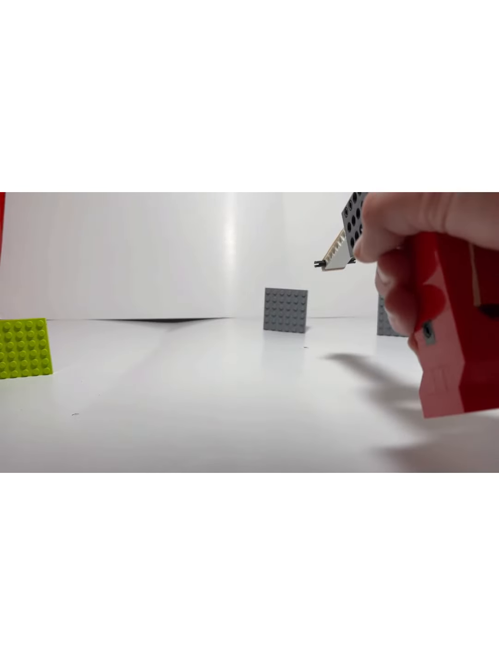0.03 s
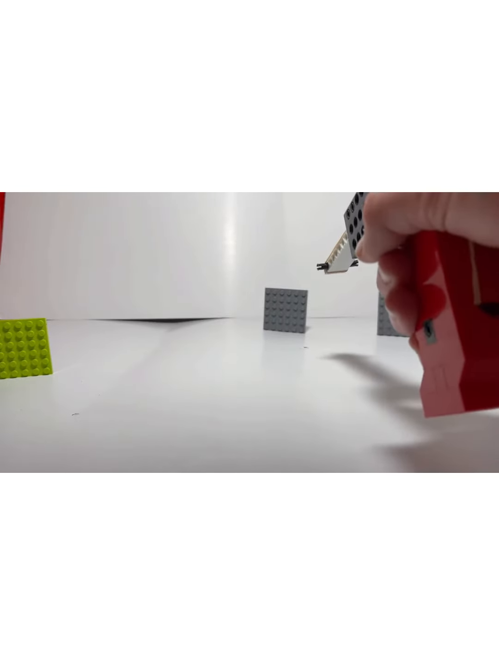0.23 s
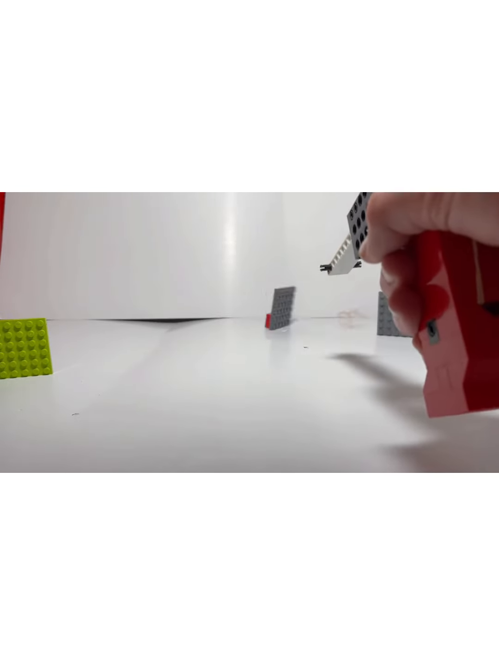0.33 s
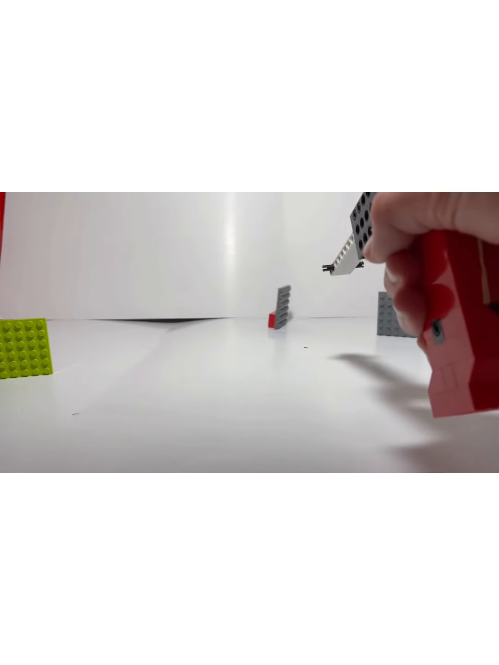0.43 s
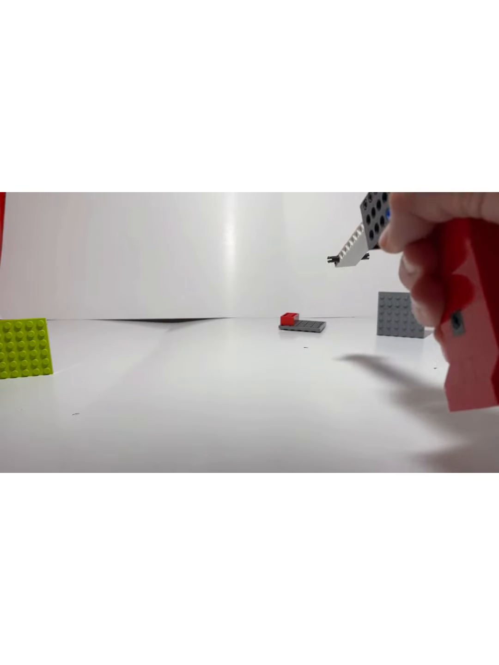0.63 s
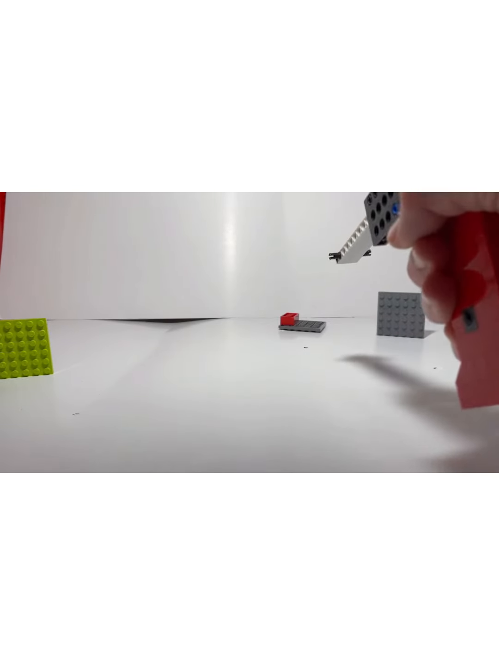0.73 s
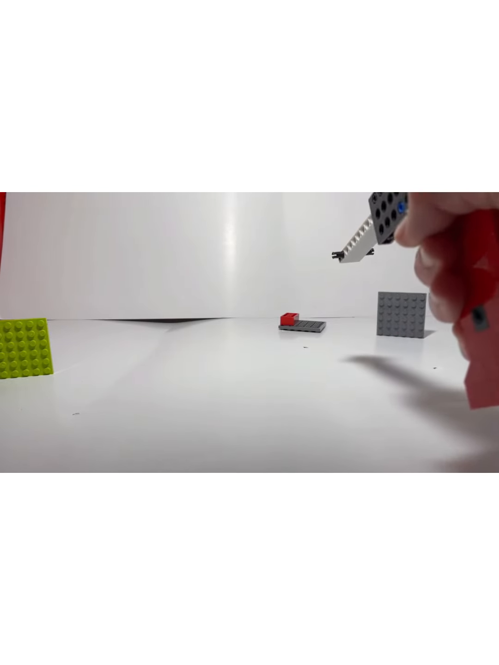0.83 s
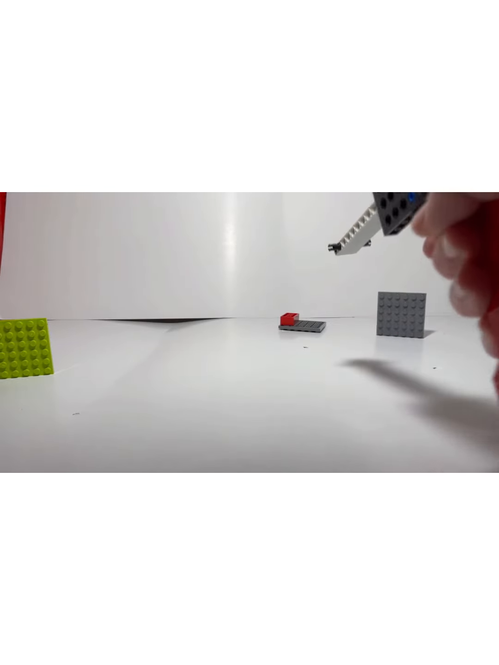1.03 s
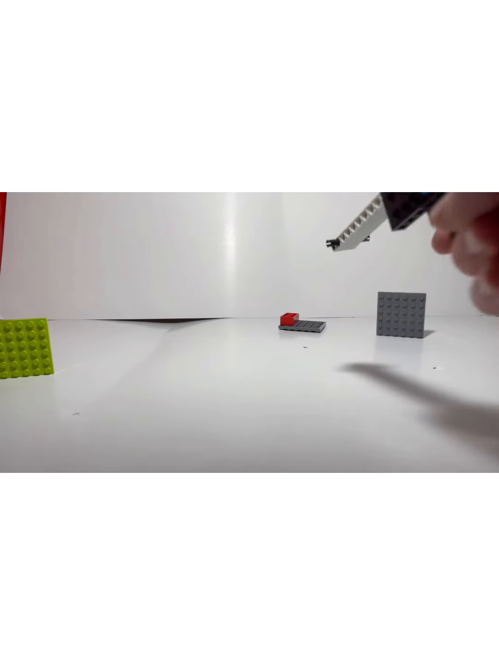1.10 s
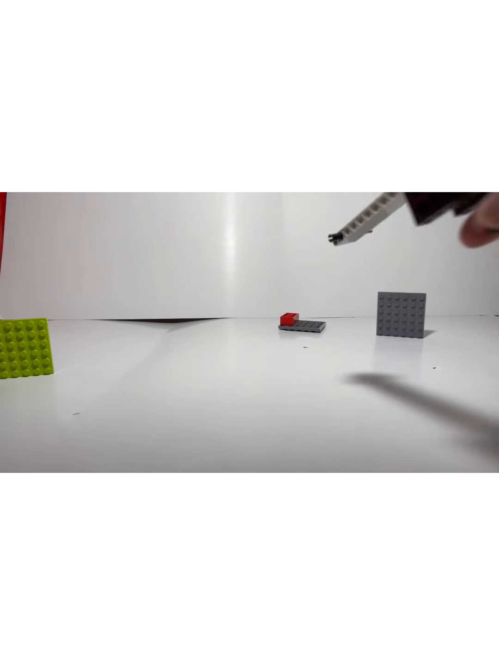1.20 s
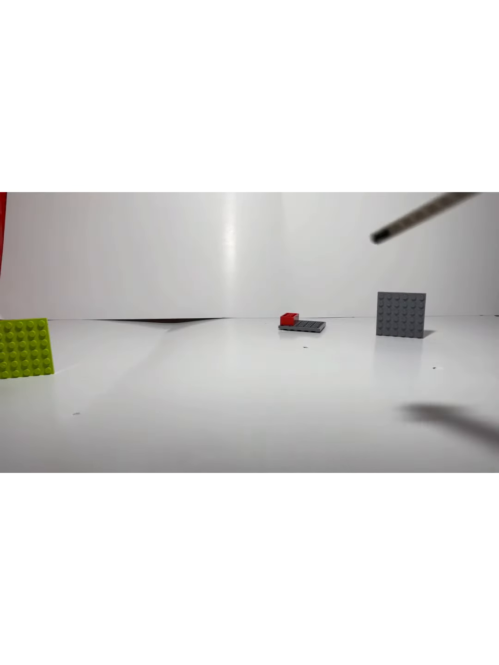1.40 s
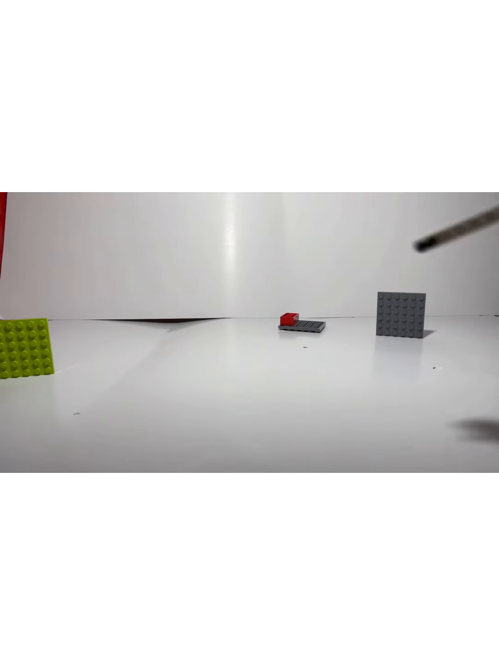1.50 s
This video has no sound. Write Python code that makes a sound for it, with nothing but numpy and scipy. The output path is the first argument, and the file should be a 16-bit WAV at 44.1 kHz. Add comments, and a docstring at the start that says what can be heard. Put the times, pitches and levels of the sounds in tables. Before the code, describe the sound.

Close stereo pickup indoors: tiny plastic ticks, a bright toy gun snap with a band slap, a brief low scrape, then a plastic plate clacks and bounces on a hollow tabletop, ending in soft sleeve rustle.

```python
"""Toy gun and plastic plate

A plastic toy gun close to the microphone creaks, releases and snaps as it fires a rubber band. The band
slaps a small plastic plate, which rocks, scrapes, tips and clacks flat on a hollow table top; a sleeve
brushes at the end. Every contact is a chattering push into decaying modes, plus a noise crack and a
fresh noise tail for the small room. Scrape and sleeve are patchy noise; the low hum is swaying noise."""
import sys
import numpy as np
from scipy import signal
from scipy.fft import rfft, irfft, next_fast_len
from scipy.io import wavfile
from scipy.ndimage import uniform_filter1d, map_coordinates

SR = 44100
rng = np.random.default_rng(int(sys.argv[2]) if len(sys.argv) > 2 else 0)


def natural_amplitude(level_db):
    """Convert a level in decibels to a linear amplitude factor, elementwise."""
    exponent = np.asarray(level_db, float) / 20
    return 10 ** exponent


def inscribe(sig):
    """Save sig as 16-bit PCM at rate SR to the path in sys.argv[1].

    A 1-D sig is mono; a 2-D sig holds one channel per row.
    Samples are clipped to [-1, 1] before scaling.
    """
    pcm = np.round(np.clip(np.atleast_2d(sig).T, -1, 1) * 32767)
    wavfile.write(sys.argv[1], SR, pcm.astype(np.int16))


N = 68355  # length in samples

# The low room rumble and hiss. Each row: frequency in Hz, relative density in dB per Hz.
HUM_COLOUR = [(15, -42.5), (25, -22.5), (39, -10), (64, 3.5), (102, -6), (161, -12), (439, -32.5),
              (575, -34), (911, -44.5), (1160, -47.5), (16000, -55)]
# Stereo width of the hum. Each row: frequency in Hz, left-right likeness (1 = mono).
HUM_LIKENESS = [(60, 1), (240, 0.81), (950, 0.1), (3770, 0.062), (15000, 0.091)]
HUM_DB, SWAY_DB = -63, 1.5  # level, and depth of its slow wander

# How fast the room dies. Each row: frequency in Hz, t60 in seconds.
ROOM_DECAY = [(200, .28), (530, 0.15), (1400, 0.23), (3700, 0.18), (9700, .21), (14000, .12)]
# Tone of the room. Each row: frequency in Hz, gain in dB.
ROOM_TONE = [(200, -0.5), (1000, 6), (2300, 0.5), (4000, -2.5), (5300, 1), (6800, -1), (9000, 1),
             (12200, 7), (12900, -26)]
# Stereo width of the room. Each row: frequency in Hz, left-right likeness (1 = mono).
ROOM_LIKENESS = [(60, 1), (200, .9), (1000, 0.75), (5000, .4)]
ROOM_SWELL_S = 0.0023  # time constant of the room's onset
RING_IN_ROOM_DB = -13  # the ringing beams less into the room than the crack

# The sleeve's strokes. Each row: time in seconds, level in dB.
SLEEVE_LEVEL = [(1.019, -106), (1.1, -93), (1.18, -82), (1.22, -78), (1.36, -78.5), (1.44, -82.5),
                (1.55, -80.5)]
# Tone of the cloth. Each row: frequency in Hz, relative density in dB per Hz.
CLOTH_COLOUR = [(600, -43), (1000, -8.5), (2200, -5), (3500, -4), (5500, 0.5), (7500, -2.5), (9500, -2.5),
                (11500, -4.5), (13000, -21)]
# The plate's edge dragging. Each row: time in seconds, level in dB.
SCRAPE_LEVEL = [(.24, -70.5), (.29, -60), (.35, -57), (.4, -60.5), (.46, -82.5), (.5, -67.5), (.528, -75.5),
                (.535, -100)]
# Tone of the dragging edge. Each row: frequency in Hz, relative density in dB per Hz.
EDGE_COLOUR = [(80, -30), (150, -2.5), (400, 4.5), (1000, -7.5), (2300, -16), (5300, -20.5), (9000, -30),
               (13000, -49.5)]

# In all contact tables, thinness is twice the corner of the four bass cuts.
# Thumps into the table top. Each row: start in seconds, level in dB, push decay in seconds,
# brightness in Hz, thinness in Hz.
TABLE_THUMPS = [(.213, -51, 0.00014, 1550, 756), (.213, -41, 0.0015, 110, 170.9),
                (.24, -61.5, 0.0011, 405, 97.2), (.3645, -65, .002, 502, 100.2),
                (.5325, -42, 0.00041, 899.7, 149.3), (.5358, -43.5, 0.0012, 600, 120.4),
                (.543, -45.5, 0.00058, 504.7, 198), (.565, -58.5, 0.004, 407, 102),
                (.58, -55.5, 0.00067, 404, 104.5), (.61, -68.5, .003, 306, 71.6)]
# Modes of the hollow table top. Each row: frequency in Hz, level in dB, t60 in seconds.
TABLE_MODES = [(77, -13.5, 0.24), (130.5, -4, 0.055), (155.23, -6, 0.12), (215, -3, 0.03), (250, -9, .07),
               (321, 3.5, 0.039), (380.6, 5.5, .055), (522, 0, 0.066), (630, -6.5, .08),
               (930, -16.5, 0.015), (1100, -19.5, .03)]
# The plate landing flat and bouncing. Each row: start in seconds, level in dB, chatter decay in seconds,
# brightness in Hz, thinness in Hz.
PLATE_CLACKS = [(.5312, -19, .0006, 15100, 600), (.5335, -29, .002, 9000, 880),
                (.543, -31.5, .002, 14000, 4170), (.563, -39.5, 0.0031, 3970, 956)]
# Modes of the plate lying flat. Each row: frequency in Hz, level in dB, t60 in seconds.
FLAT_PLATE_MODES = [(1080, -9.5, 0.023), (1400, -5.5, 0.0067), (1917, -5, 0.0091), (3000, -7, 0.0057),
                    (4180, -13.5, 0.0088), (5070, -8, 0.024), (6000, -7.5, .01), (7240, -6, 0.0072),
                    (8900, 1.5, 0.0081), (9714, -9.5, 0.004), (10660, -9, 0.024), (12070, -19, .01)]
# Contacts of the plate. Each row: start in seconds, level in dB, chatter decay in seconds,
# brightness in Hz, thinness in Hz.
PLATE_CONTACTS = [(.2147, -28, 0.00082, 8983, 900), (.239, -28.5, 0.0012, 2500, 1400),
                  (.303, -47.5, 0.0015, 3880, 686), (.3313, -47.5, 0.0011, 3000, 1480),
                  (.3652, -24.5, 0.002, 6000, 2200), (.402, -68.5, .002, 3880, 900)]
# Modes of the plate before it lies flat. Each row: frequency in Hz, level in dB, t60 in seconds.
PLATE_MODES = [(1130, -22.5, 0.011), (1300, -6, .015), (1807, -5.5, 0.041), (2410, 9, 0.0052),
               (2918, -4.5, 0.024), (3343, -11.5, .007), (4556, -11.5, 0.004), (5340, -14, .012),
               (6400, -19, 0.03), (9200, -11, .012), (11160, -10.5, .008)]
# Dry ticks of plastic parts under the hand. Each row: start in seconds, level in dB,
# chatter decay in seconds, brightness in Hz, thinness in Hz.
PART_TICKS = [(.160, -56, .003, 2500, 907.5), (.1755, -51.5, 0.0017, 3000, 1500),
              (.178, -32.5, .001, 9700, 500), (.192, -49, .004, 9600, 900), (.485, -57, .0015, 6000, 696),
              (1.059, -66, 0.0012, 14000, 6000), (1.1865, -51, .001, 11200, 3530)]
# Modes of those small parts. Each row: frequency in Hz, level in dB, t60 in seconds.
PART_MODES = [(1300, -9.5, 0.012), (2500, -10.5, 0.012), (5800, -11, 0.0062), (9000, -6.5, .004),
              (11200, -1, .004)]
# Contacts inside the gun. Each row: start in seconds, level in dB, chatter decay in seconds,
# brightness in Hz, thinness in Hz.
GUN_CONTACTS = [(.198, -32.5, 0.0034, 3000, 900), (.2015, -39, 0.0067, 14000, 1500),
                (.2072, -15.5, .0008, 16000, 3000), (.2085, -19, 0.003, 12300, 1500),
                (.2098, -20.5, 0.0012, 5000, 1975), (.2128, -26, .0012, 12050, 4970),
                (.2205, -29.5, 0.0023, 11030, 7047)]
# Modes of the gun's plastic body. Each row: frequency in Hz, level in dB, t60 in seconds.
GUN_MODES = [(1000, -34, 0.0075), (1400, -19.5, .015), (1840, -18, 0.012), (2300, -1, 0.029),
             (3350, -26, 0.012), (3940, -13.5, 0.026), (5280, -3, 0.012), (7260, -13, .015),
             (8183, -9.5, 0.011), (8160, -3.5, 0.0064), (9050, 8, 0.013), (9900, -2, 0.021),
             (10704, 0, .015), (11550, -8, 0.017), (12930, -4.5, 0.0069)]

# Level between the microphone's two ports. Each row: frequency in Hz, left minus right in dB.
PORT_LEVEL = [(100, -1), (500, -2), (2000, -0.5), (5000, 3), (9000, 0.2)]
# Phase between the ports. Each row: frequency in Hz, radians by which left leads.
PORT_PHASE = [(200, .2), (1000, .3), (1890, .3), (2600, 1.1), (7900, 1.05)]
MERGE_HZ, MERGE_SHARE = 7900, .85  # above it, this share of both sides comes from the left signal
TREBLE_LAG_S = .000283  # above MERGE_HZ the left side comes late
LOW_CUT_HZ, TOP_HZ, TOP_DB = 93, 12900, -18  # the microphone's bass cut and treble step


def unit(x):
    """Scale to rms 1."""
    return x / np.sqrt(np.mean(x ** 2) + 1e-20)


def along(points, hz):
    """Read a curve of (Hz, value) points on a log frequency axis."""
    f, value = np.transpose(points)
    return np.interp(np.log(hz + 1), np.log(f + 1), value)


def filtered(x, response):
    """Filter x by a complex response of frequency."""
    size = next_fast_len(x.shape[-1] + SR // 2)
    spectrum = rfft(x, size) * response(np.fft.rfftfreq(size, 1 / SR))
    return irfft(spectrum, size)[..., :x.shape[-1]]


def spread(pair, colour, likeness):
    """Colour two unrelated noises and mix them as mid and side to a given left-right likeness."""
    def response(hz):
        angle = np.arccos(np.clip(along(likeness, hz), -1, 1)) / 2
        return natural_amplitude(along(colour, hz)) * [np.cos(angle), np.sin(angle)]

    mid, side = filtered(pair, response)
    return np.array([mid + side, mid - side])


def hum():
    """Low room rumble with a faint hiss above: coloured noise whose level wanders slowly."""
    sway = map_coordinates(rng.standard_normal(30), [np.arange(N) * 12 / SR])  # 12 random points a second
    noise = unit(spread(rng.standard_normal((2, N)), HUM_COLOUR, HUM_LIKENESS))
    return natural_amplitude(HUM_DB + SWAY_DB * sway) * noise


def room_tail():
    """A new stereo room answer: noise that swells in, each frequency dying at its own speed."""
    hz, t, z = signal.stft(rng.standard_normal((2, SR // 3)), SR, nperseg=256)
    decay = natural_amplitude(-60 * t / along(ROOM_DECAY, hz)[:, None])
    noise = signal.istft(z * decay, SR, nperseg=256)[1]
    noise = noise * (1 - np.exp(-np.arange(noise.shape[1]) / SR / ROOM_SWELL_S))
    return spread(noise / np.linalg.norm(noise[0]), ROOM_TONE, ROOM_LIKENESS)


def rub(levels, colour, likeness, patchy_db):
    """Friction: noise made patchy in time and frequency, under a level curve."""
    s, db = np.transpose(levels)
    z = signal.stft(rng.standard_normal((2, N)), nperseg=512)[2]
    patches = uniform_filter1d(rng.standard_normal(z.shape[1:]), 6, 0)
    patches = unit(uniform_filter1d(patches, 4, 1))
    pair = signal.istft(z * natural_amplitude(patchy_db * patches), nperseg=512)[1][:, :N]
    level = natural_amplitude(np.interp(np.arange(N) / SR, s, db, left=-140))
    return level * unit(spread(pair, colour, likeness))


def sleeve():
    """Cloth brushes over the table as the arm draws back: wide, bright friction noise."""
    return rub(SLEEVE_LEVEL, CLOTH_COLOUR, [(1000, .15)], patchy_db=3.0)


def scrape():
    """The edge of the plate drags on the table while it tips over: low friction noise."""
    return rub(SCRAPE_LEVEL, EDGE_COLOUR, [(300, .85), (3000, .6)], patchy_db=3.5)


def struck(hits, modes, wet_db, crack_db, chatter=.45, soft=False):
    """Each contact is a push with some chatter that rings the modes, cracks, and wakes the room."""
    out = np.zeros((2, N + SR))
    t = np.arange(SR // 4) / SR
    click = t == 0
    ring = sum(natural_amplitude(level - 60 * t / t60) * np.sin(2 * np.pi * hz * t) for hz, level, t60 in modes)
    for start_s, db, length_s, bright_hz, thin_hz in hits:
        fade = np.exp(-t / max(length_s, 1e-4))
        size = np.linalg.norm(fade)
        # a soft push fades out, a hard one is a single click
        blow = fade if soft else size * click
        push = (1 - chatter) * blow + chatter * fade * rng.standard_normal(len(t))
        rung = signal.fftconvolve(ring, push / np.linalg.norm(push))[:len(t)]
        crack = natural_amplitude(crack_db) * fade * rng.standard_normal(len(t)) / size
        # the room gets a quieter ring, and the crack as one click
        to_room = natural_amplitude(RING_IN_ROOM_DB) * rung + natural_amplitude(crack_db) * click

        def tone(hz):
            bass_cut = 1j * hz / (thin_hz / 2 + 1j * hz)
            return (bass_cut ** 2 / (1 + 1j * hz / bright_hz)) ** 2

        direct, sent = natural_amplitude(db) * filtered(np.array([rung + crack, to_room]), tone)
        wet = natural_amplitude(wet_db) * signal.fftconvolve(sent[None], room_tail(), axes=1)
        at = round(start_s * SR)
        out[:, at:at + len(direct)] += direct
        out[:, at:at + wet.shape[1]] += wet
    return out[:, :N]


def table_thumps():
    """Soft pushes set the low modes of the hollow table top ringing."""
    return struck(TABLE_THUMPS, TABLE_MODES, wet_db=7.5, crack_db=-45.5, chatter=0.066, soft=True)


def part_ticks():
    """Small plastic parts tick under the hand, with short bright modes."""
    return struck(PART_TICKS, PART_MODES, wet_db=-6, crack_db=11)


def plate_clacks():
    """The plate lands flat and bounces: strong cracks over heavily damped modes."""
    return struck(PLATE_CLACKS, FLAT_PLATE_MODES, wet_db=-4.5, crack_db=16.23)


def plate_contacts():
    """The band slaps the plate, which rocks: hard contacts ring its own modes."""
    return struck(PLATE_CONTACTS, PLATE_MODES, wet_db=-8.5, crack_db=5)


def gun():
    """The gun releases and snaps: a quick run of hard contacts in its bright plastic body."""
    return struck(GUN_CONTACTS, GUN_MODES, wet_db=-4, crack_db=14.5)


def scene():
    """All sources in the room."""
    contacts = gun() + part_ticks() + plate_contacts() + plate_clacks() + table_thumps()
    return contacts + scrape() + hum() + sleeve()


def top_cut(x):
    """Nothing passes above the cut-off."""
    return signal.sosfilt(signal.butter(12, 16640, fs=SR, output="sos"), x)


def record(dry):
    """Two ports that differ in level and phase; in the high treble both sides mostly share one signal."""
    def share(hz):
        return MERGE_SHARE / (1 + (MERGE_HZ / (hz + 1)) ** 20)

    side = np.array([[.5], [-.5]])  # half of each difference goes to each port

    def port(hz):
        lead = along(PORT_PHASE, hz) - 2 * np.pi * TREBLE_LAG_S * np.maximum(hz - MERGE_HZ, 0)
        return natural_amplitude(side * along(PORT_LEVEL, hz)) * np.exp(1j * side * lead)

    def microphone(hz):
        treble_step = natural_amplitude(TOP_DB / (1 + (TOP_HZ / (hz + 1)) ** 40))
        return treble_step * 1j * hz / (LOW_CUT_HZ + 1j * hz)

    merged = filtered(dry, lambda hz: 1 - share(hz)) + filtered(dry[0], share)
    ports = filtered(merged, port)
    mix = filtered(ports, microphone)
    return top_cut(mix)


dry = scene()
out = record(dry)
inscribe(out)
```